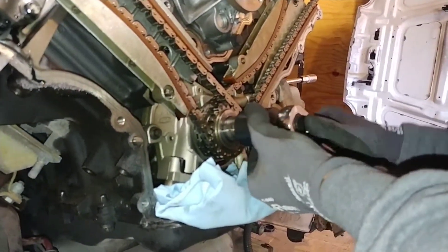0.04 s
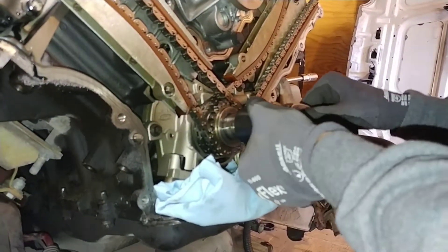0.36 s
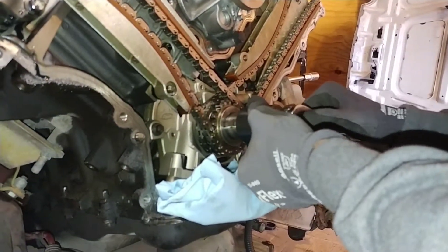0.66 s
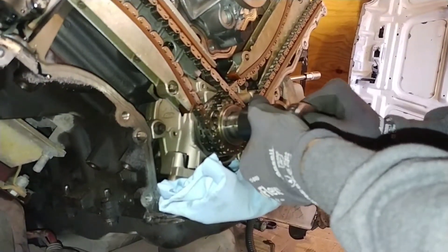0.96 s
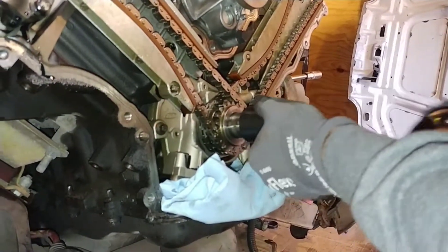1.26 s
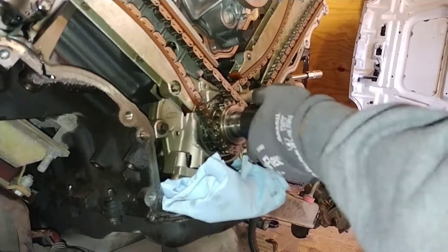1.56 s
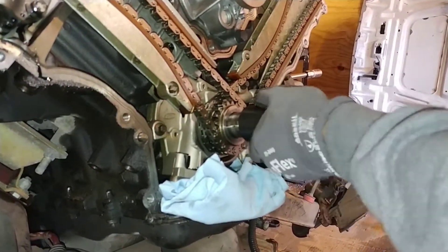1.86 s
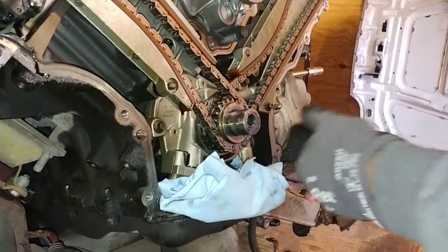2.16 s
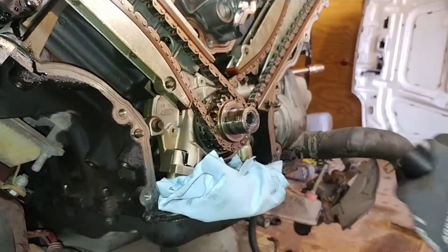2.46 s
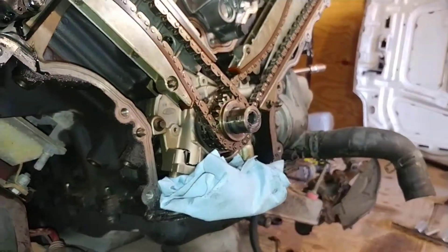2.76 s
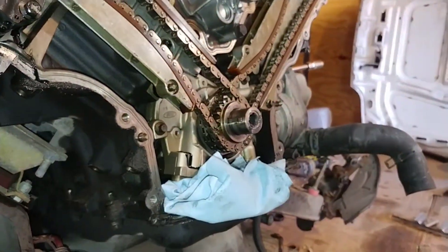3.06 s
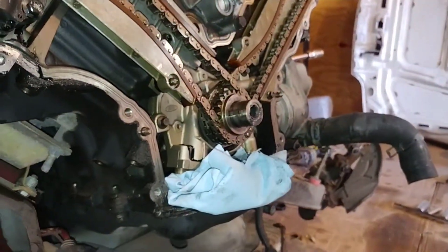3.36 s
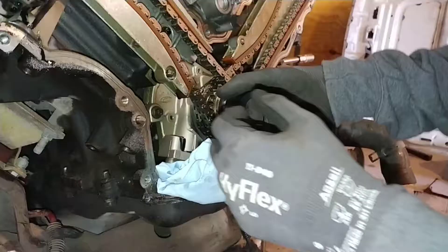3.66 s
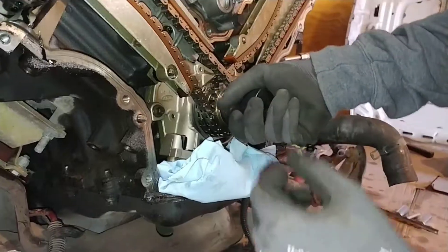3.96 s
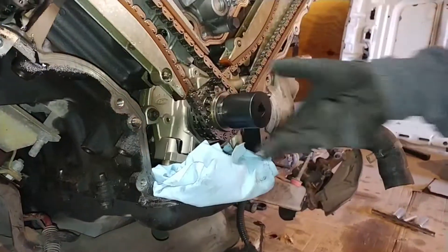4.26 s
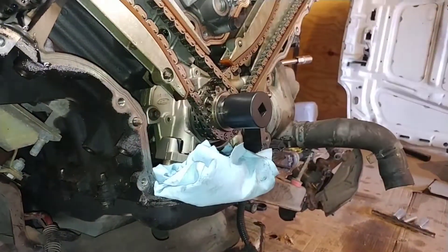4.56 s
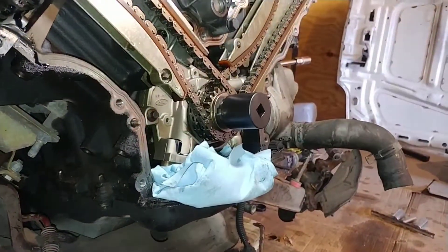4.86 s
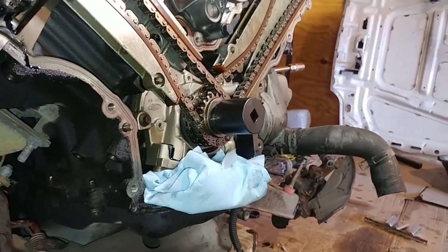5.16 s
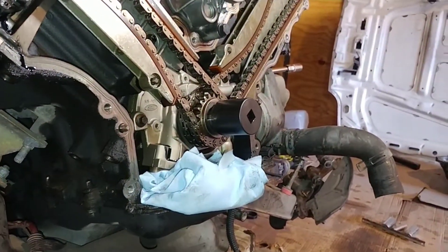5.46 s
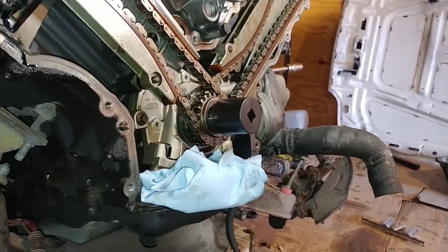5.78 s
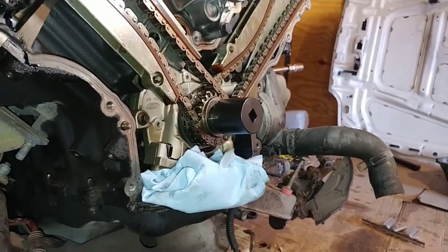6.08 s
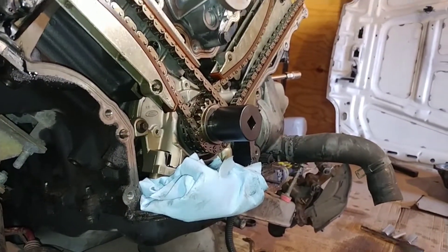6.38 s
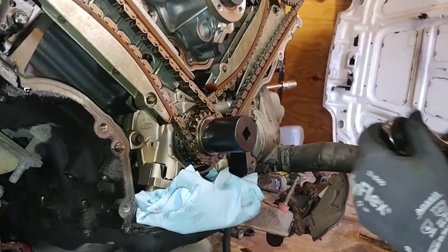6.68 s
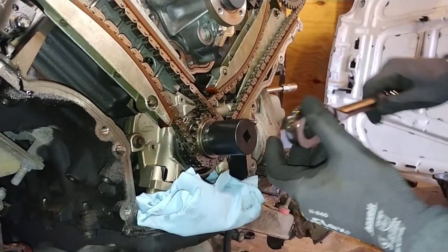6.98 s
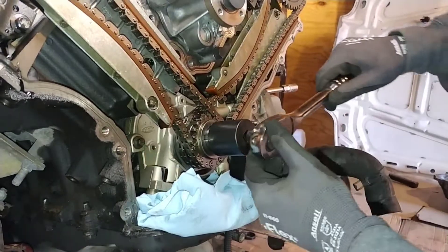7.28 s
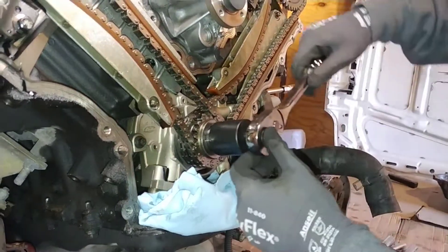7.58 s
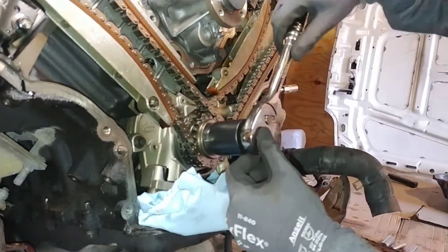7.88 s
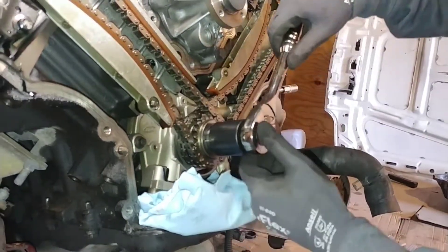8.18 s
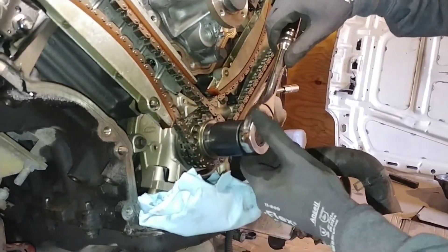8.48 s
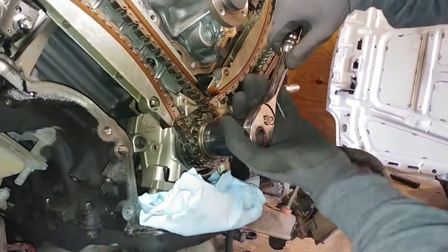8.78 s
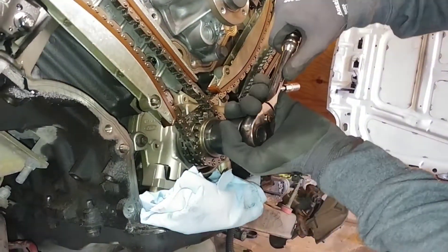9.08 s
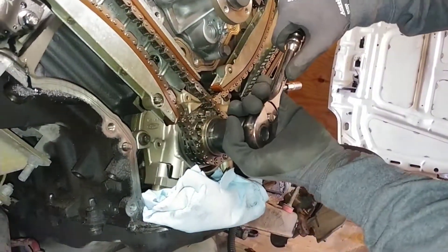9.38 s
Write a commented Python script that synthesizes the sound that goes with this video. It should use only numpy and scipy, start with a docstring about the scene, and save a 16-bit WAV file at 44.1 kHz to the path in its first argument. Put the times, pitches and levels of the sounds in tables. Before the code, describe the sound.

A quick run of sharp steel clicks opens the first half second as a tool knocks against an engine's crankshaft. Lighter taps, a small clink near 0.9 seconds and soft, dull bumps follow until about 3 seconds. At 3.25 seconds a big steel socket clangs down, bounces louder at 3.4 and rings brightly, breaking off abruptly at 3.5. A quiet stretch follows, with faint glove and sleeve rubs, tiny taps and one soft ringing ting at 5.3 seconds. From 7.3 to 7.8 seconds a ratchet is worked into the socket with uneven clicks and short clinks, and it snaps home loudly at about 8.1. Faint glove rubbing continues to around 9.5 seconds. The tools are close and slightly to the right, with a short garage echo over a low rumble and a faint hum.

```python
"""Socket and ratchet on an engine

Steel tools click against a crankshaft; a big socket clangs down, bounces and rings in beating pairs of
modes; a ratchet is worked into it and snaps home. In between, gloves rub, steel taps and parts bump.
The engine bay scatters each click and the garage echoes, over a low rumble and a faint hum."""
import sys
import numpy as np
from scipy import signal
from scipy.fft import rfft, irfft, next_fast_len
from scipy.io import wavfile
from scipy.ndimage import uniform_filter1d, minimum_filter1d

SR = 44100
rng = np.random.default_rng(int(sys.argv[2]) if len(sys.argv) > 2 else 0)


def waveform_to_disk(signal):
    """Save audio, clipped to [-1, 1], as 16-bit WAV at the path in sys.argv[1]."""
    frames = np.transpose(np.atleast_2d(signal))
    scaled = np.clip(frames, -1, 1) * 32767
    samples = np.round(scaled).astype(np.int16)
    wavfile.write(sys.argv[1], SR, samples)


N = 424683

# background spectrum (frequency [Hz], relative density [dB])
BACKGROUND_SPECTRUM = [(15, -27.5), (25, -3.5), (86, -2), (127, -11), (160, -13.5), (244, -21.5),
                       (263, -19.5), (390, -23.5), (1000, -30), (1920, -32.5), (2250, -30), (4690, -38.5),
                       (6090, -46), (13000, -49.5)]
# hum swells (middle [s], length [s])
HUM_SWELLS = [(5.257, 1.2), (8.9, 0.91)]
# garage echo (frequency [Hz], density [dB], t60 [s])
ECHO_BANDS = [(150, -5, 0.5), (498.8, -0.5, 0.45), (1070, -0.5, 0.6), (1530, -4.5, .5), (2340, -4, 0.62),
              (3522, -11, 0.43), (5303, -14.5, 0.48), (6400, -17.5, 0.32), (8500, -13.5, 0.45),
              (11700, -24, .25)]
# left-right balance by frequency: the left side is weaker from about 1 to 7 kHz (frequency [Hz], left minus
# right [dB])
WORK_PAN = [(300, 0.5), (800, -1.5), (1450, -4), (2200, -9), (3500, -10), (5200, -8.5), (6300, -4.5),
            (8000, 1.5), (11000, .5)]
# gloves and sleeves, and a few brief steel scrapes (middle [s], length [s], level [dB], centre [Hz])
CLOTH_RUBS = [(.915, .05, -54, 3000), (1.24, .07, -71, 4000), (1.315, .075, -62.5, 3800),
              (1.466, .14, -70, 3400), (2.519, 1, -71, 863), (2.798, 0.61, -75.5, 2950),
              (3.675, 0.24, -74, 4030), (4.125, 0.13, -66.5, 4500), (4.42, 0.36, -73.5, 895),
              (4.45, .3, -75, 2400), (4.69, 0.4, -70.5, 3600), (6.55, .25, -80, 3300),
              (6.82, .15, -76, 3600), (7.005, .03, -68, 4000), (8.672, 0.11, -68, 4600),
              (8.95, .8, -74, 2100), (9.05, .5, -73.5, 4200), (9.44, 0.24, -73, 2500)]
# heavy parts bumping (time [s], level [dB], centre [Hz], knocks [count])
PART_BUMPS = [(.449, -57, 757, 1), (.829, -59, 660, 1), (0.832, -62, 109, 1), (0.993, -57, 89.5, 1),
              (1.739, -62, 696, 1), (1.821, -51, 730, 1), (1.835, -55.5, 740, 1), (2.224, -64.5, 726, 1),
              (2.726, -54.5, 550, 1), (2.732, -54, 170, 1), (2.79, -61, 524, 1), (3.2509, -41, 265, 1),
              (3.3744, -34.5, 290, 4), (3.582, -63.5, 468, 1), (3.935, -71, 855, 2), (5.324, -66.5, 910, 1),
              (7.28, -54.5, 850, 1), (7.719, -48, 420, 1), (8.139, -47.5, 480, 1)]
# taps on parts (time [s], relative level [dB], centre [Hz], t60 [ratio], touch [s], grit [dB])
PART_TAPS = [(.752, -68, 4900, 0.093, .0015, -1), (.824, -54.5, 4500, 0.2, .016, 1),
             (.829, -51.5, 1320, 0.45, 0.015, 3), (.92, -47, 3920, .14, 0.011, -4),
             (.925, -39, 1920, 0.97, 0.0067, 7), (1.74, -63.5, 2400, .1, .005, -9),
             (1.82, -47.5, 2220, 0.42, .016, 5), (1.952, -55.5, 2870, 0.27, 0.023, -1),
             (3.58, -56, 2300, .08, 0.0032, -2), (3.64, -70, 2475, .11, 0.0044, 0),
             (4.105, -62, 4600, .4, 0.027, -5), (4.655, -70, 3160, 0.42, .008, -14),
             (4.742, -62.5, 3180, 0.31, .008, -15), (4.78, -64, 2895, .6, .012, -5),
             (8.88, -65.5, 5000, .5, .012, -10)]
# tapped parts (frequency [Hz], level [dB], t60 [s])
PART_MODES = [(1420, -4, .09), (1700, -4, .15), (2215, -3, .4), (2420, -2, .15), (2640, -5, .12),
              (2890, -4, .2), (3208, -2, .22), (3550, -4, .12), (4540, -3, .12), (4990, -4, .16)]
# socket pushed home (start [s], length [s], level [dB], centre [Hz])
SOCKET_SCRAPES = [(3.923, .075, -75.5, 1100)]
# steel on steel (time [s], level [dB], resonance [Hz], body [dB], treble [dB], second contact offset [s])
STEEL_CLICKS = [(.0075, -23, 4550, -8.5, -18, -0.0054), (.069, -22.5, 3700, -13, -23.5, 0),
                (0.1242, -44.5, 3300, -1.5, -24.5, 0), (0.1353, -25.5, 4650, -3.5, -12.5, 0),
                (.2085, -28, 5200, -1.5, -7.5, 0), (.3409, -21.5, 3650, -17, -22, -0.00057),
                (3.2514, -22.5, 3250, -10, -21.5, -0.0037), (3.3712, -24, 4000, -6.5, -19.5, 0),
                (3.376, -14, 3000, -7.5, -26, -0.0022), (3.407, -23.5, 3900, -9.5, -22.5, 0),
                (5.324, -52, 3400, 2, -30, 0), (7.28, -45, 1470, 16.5, -32, 0),
                (7.37, -30, 4960, 2.5, -15.5, 0), (7.469, -37.5, 3540, 16.5, -26.5, 0),
                (7.5113, -22.5, 4120, -7, -7, 0), (7.575, -26.5, 4650, -11, -11.5, -.0036),
                (7.6398, -29, 5100, -5.5, -6, -.003), (7.7195, -21.5, 4600, 3.5, -27, .0034),
                (7.729, -28, 2600, 1.5, -31.5, 0), (7.77, -34, 4500, -17.5, -18.5, 0),
                (7.7812, -19, 4900, -5.5, -14.5, 0), (8.1392, -14.5, 5030, -4.5, -11, -0.0013)]
# click spectrum (frequency [Hz], level [dB], body share [ratio], treble share [ratio])
CLICK_SPECTRUM = [(100, -11.5, 0.7, 0.17), (383, -19, 0.99, 0.029), (625, -2.5, 0.77, 0.16),
                  (1600, 2, 0.81, 0.014), (2700, 5, 0.8, 0.092), (5470, -2.5, 0.06, 0.045),
                  (6900, 0.5, 0.5, 0.74), (8760, -3, 0.002, 0.82), (10230, -13.5, 0, 0.91),
                  (11164, -8.5, 0.78, 1), (11500, -12.5, 0.94, 1), (13000, -35.5, 0.076, 0.97)]
# damped tool head (frequency [Hz], level [dB], t60 [s])
HEAD_MODES = [(2750, -2, .016), (3300, -1, .007), (3650, -3, .005), (3950, -4, .005), (4550, 0, .009),
              (5130, -1, .012), (5480, -7, .009), (7350, -17, .01), (8750, -19, .022), (11400, -24, .02)]
# ratchet's faint ring (frequency [Hz], level [dB], t60 [s])
RATCHET_MODES = [(1470, 3, 0.28), (1780, 3, 0.2), (2156, -5.5, .25)]
# knocks on the ratchet (time [s], level [dB], t60 [ratio])
RATCHET_KNOCKS = [(.0075, -58, 0.88), (.1352, -59, 1), (7.28, -52, 1), (7.37, -54, 1), (7.7195, -48.5, 1),
                  (7.7813, -48.5, 1)]
# socket seated on the crankshaft (frequency [Hz], level [dB], t60 [s])
SEATED_MODES = [(2444, -20, .5), (2750, -10, 0.11), (2815.4, 0.5, .55), (2857, -3, 0.55),
                (3430, -11.5, 0.28), (4926, -22.5, .22), (5006, -20.5, .4)]
# knocks on the seated socket (time [s], level [dB], t60 [ratio])
SEATED_HITS = [(5.3238, -44, 0.97), (7.512, -50.5, .4), (7.639, -40, 0.41), (7.72, -38, .25),
               (7.7826, -46, .3), (8.139, -14.5, 0.042), (8.146, -43, .8)]
# what the socket lands on (frequency [Hz], relative density [dB], t60 [s])
CLATTER_BANDS = [(100, -22.5, .4), (230.7, -4.5, 0.3), (500, -7, 0.53), (990, -10.5, 0.25), (2001, 2.5, 1),
                 (2750, 8, 0.52), (3900, -3, .6), (5173, 3, 0.552), (6400, -16, .45), (8510, -13, .36),
                 (9740, -33, .15), (11298, -31, .15), (13490, -57.5, .1)]
# loose socket (frequency [Hz], level [dB], t60 [s], left minus right [dB], gain by strike place [dB])
LOOSE_MODES = [(2707, -18, .5, -7.5, 0), (2746, -18, .4, -7, 0), (2802, -13, .55, -3, 1.5),
               (2834, 1, .64, -11, -1), (2865, -3, .55, -7.5, -2.5), (2912, -14, .6, -6, 5),
               (3009, -17, .25, -5, 2), (3115, -20, .4, -5.5, 1), (3262, -19, .25, -6, 4),
               (3395, -19, .35, -7, 0), (3425, -20, .35, -6, -7), (3763, -23, .35, -6, 0),
               (4670, -22, .45, -8.5, 0), (4936, -13, .35, -4.5, -2), (5020, -7, .35, -4, -2),
               (5060, 0, .7, -5, -1), (5115, -9, .3, -6, -1), (5240, -8, .35, -7, 4), (5289, -3, .5, -6, 7),
               (7893, -22, .3, 3, 0), (8130, -34, .3, -1.5, 4), (8670, -22, .2, -3, 4),
               (8760, -25, .16, -2, 3), (11300, -37, .2, 10, -2), (11480, -38, .12, 10, 0)]
# blows on the loose socket (time [s], ring [dB], strike place [-1..1], clatter [dB])
LOOSE_BLOWS = [(3.251, -18.5, 1, -31), (3.3741, -12, -.85, -23.5)]


def undb(db):
    """Decibels to gain."""
    return 10 ** (np.asarray(db) / 20)


def unit(x):
    """Scale to rms 1."""
    return x / np.sqrt(np.mean(x ** 2))


def onset_std(x):
    """Spread over the first 20 ms."""
    return x[:, :SR // 50].std()


def sides(pan_db):
    """Left and right gains at constant power."""
    return unit(undb(np.array([[pan_db], [-pan_db]]) / 2))


def add(out, s, x):
    """Mix x in from time s."""
    i = max(int(s * SR), 0)
    out[:, i:i + x.shape[1]] += x[:, :N - i]


def fade(t, t60_s):
    """Exponential decay."""
    return np.exp(-np.log(1000) * t / t60_s)


def swell(t, s, length_s):
    """Gaussian hump round time s."""
    return np.exp(-(2 * (t - s) / length_s) ** 2)


def along(f, hz, values):
    """Interpolate over log frequency."""
    return np.interp(np.log(f + 1), np.log(hz), values)


def bell(f, hz, octaves):
    """Gaussian hump round hz."""
    return np.exp(-.5 * (np.log2((f + 1) / hz) / octaves) ** 2)


def walk(rate_hz, size=N):
    """Smooth random drift, rms 1."""
    hold = int(SR / rate_hz)
    steps = np.repeat(rng.standard_normal(size // hold + 1), hold)
    return unit(uniform_filter1d(uniform_filter1d(steps, hold), hold)[:size])


def colour(x, gain):
    """Minimum-phase filter with response gain(Hz)."""
    n = 2 * next_fast_len(x.shape[-1])
    cepstrum = irfft(np.log(gain(np.arange(n // 2 + 1) * SR / n) + 1e-6))
    cepstrum[1:n // 2] *= 2
    cepstrum[n // 2 + 1:] = 0
    return irfft(rfft(x, n) * np.exp(rfft(cepstrum)))[..., :x.shape[-1]]


def lean(x, share=1):
    """Pan rightward by frequency, at constant power."""
    ratio = lambda f: undb(share * along(f, *np.transpose(WORK_PAN)))
    right = lambda f: np.sqrt(2 / (1 + ratio(f) ** 2))
    return np.array([colour(x[0], lambda f: ratio(f) * right(f)), colour(x[1], right)])


def lag_left(x, lag_s=.00027):
    """Sound from the right reaches the left side later."""
    return np.array([np.pad(x[0], (round(lag_s * SR), 0))[:N], x[1]])


def modes(table, t, weight_db, scatter_db=2, t60_ratio=1, apart_rad=.9):
    """Decaying partials weighted by weight_db(Hz); each strike excites them differently."""
    out = 0
    for (hz, db, t60_s), (loud, turn, apart) in zip(table, rng.standard_normal((len(table), 3))):
        phase = np.pi * turn + apart_rad * apart * np.array([[0], [1]])
        gain = undb(db + weight_db(hz) + scatter_db * loud)
        out = out + gain * np.sin(2 * np.pi * hz * t + phase) * fade(t, t60_s * t60_ratio)
    return out


def wash(table, alike_hz=500, size=36000):
    """Diffuse decay in third octaves; the lows are alike on both sides."""
    hz, db, t60_s = np.transpose(table)
    t, f = np.arange(size) / SR, np.arange(size // 2 + 1) * SR / size
    left, other = rfft(rng.standard_normal((2, size)))
    alike = np.exp(-.5 * (f / alike_hz) ** 2)
    noise = np.array([left, alike * left + np.sqrt(1 - alike ** 2) * other])
    out = 0
    for centre_hz in 80 * 2 ** (np.arange(23) / 3):
        inside = abs(np.log2((f + 1) / centre_hz)) < 1 / 6
        band = irfft(noise * inside) * fade(t, along(centre_hz, hz, t60_s))
        band *= np.sqrt(inside.mean() / np.sum(band ** 2, axis=1, keepdims=True))
        out = out + band * undb(along(centre_hz, hz, db))
    return out


def background(level_db=-62, lull_db=-5.5, hum_hz=153, rumble_flutter_db=3, hiss_flutter_db=1.8):
    """Unsteady rumble and hiss with one lull; a faint hum swells twice."""
    t = np.arange(N) / SR
    spectrum = lambda f: undb(along(f, *np.transpose(BACKGROUND_SPECTRUM)))
    mono_share = lambda f: .9 * bell(f, 260, octaves=1.2)
    noise = colour(rng.standard_normal((2, N)), lambda f: spectrum(f) * np.sqrt(1 - mono_share(f)))
    noise += colour(rng.standard_normal((1, N)), lambda f: spectrum(f) * np.sqrt(mono_share(f)))
    noise = unit(noise) * undb(level_db + lull_db * swell(t, 6.11, length_s=.59))
    low = signal.sosfiltfilt(signal.butter(2, 140, fs=SR, output="sos"), noise)
    hum_rad = 2 * np.pi * np.cumsum(hum_hz * (1 + .071 * walk(23))) / SR
    hum_db = -79.5 + 17 * sum(swell(t, *row) for row in HUM_SWELLS) + 2 * walk(7.4)
    rumble = low * undb(rumble_flutter_db * walk(16)) * sides(pan_db=4)
    hiss = (noise - low) * undb(hiss_flutter_db * walk(3))
    return rumble + hiss + np.sin(hum_rad) * undb(hum_db)


def garage_echo(x, response, wet_db):
    """The room's diffuse answer to the mono sum."""
    return undb(wet_db) * signal.oaconvolve(x.sum(0, keepdims=True) / np.sqrt(2), response, axes=1)[:, :N]


def rubs(grain_db=3, grain_hz=140):
    """Cloth catches and slips, and steel scrapes briefly: grainy hiss that swells and dies."""
    out, grain = np.zeros((2, N)), undb(grain_db * walk(grain_hz))
    rolloff = lambda f: undb(along(f, [5400, 6500, 12000], [0, -12, -19]))
    for s, length_s, db, hz in CLOTH_RUBS:
        size = int(length_s * SR)
        octaves = .99 + .2 * np.log2(hz / 4500)  # brighter rubs are broader
        hiss = colour(rng.standard_normal((2, size)), lambda f: (bell(f, hz, octaves) + .012) * rolloff(f))
        add(out, s - length_s / 2, unit(hiss) * np.hanning(size) * undb(db) * sides(pan_db=-2))
    return out * grain


def bumps(t60_s=.075, gap_s=.036, gap_ratio=.9, step_db=-4.5, size=8192):
    """Soft blows on heavy parts: dull knocks, faster and weaker as a part rocks to rest."""
    out, t = np.zeros((2, N)), np.arange(size) / SR
    for s, db, hz, count in PART_BUMPS:
        for k in range(round(count)):
            burst = rng.standard_normal((1, size)) * fade(t, t60_s)
            knock = colour(burst, lambda f: bell(f, hz, octaves=.46) + .0018)
            knock /= np.sqrt(np.sum(knock ** 2) / (.015 * SR))  # energy of 15 ms at rms 1
            add(out, s, knock * undb(db + k * step_db))
            s += gap_s * gap_ratio ** k
    return out


def grit(noise, hz, octaves, floor=0):
    """Friction noise: a band round hz, the top shelved down."""
    return colour(noise, lambda f: (bell(f, hz, octaves) + floor) * undb(along(f, [5400, 6500], [0, -12])))


def taps(octaves=.35, focus_db=16, size=24000):
    """Steel brushes a part: brief grit, under which the part's ring builds."""
    out, t = np.zeros((2, N)), np.arange(size) / SR
    for s, db, hz, t60_ratio, touch_s, grit_db in PART_TAPS:
        ring = modes(PART_MODES, t, lambda f: focus_db * (bell(f, hz, octaves) - 1), t60_ratio=t60_ratio)
        ring *= 1 - np.exp(-2 * t / touch_s)
        touch = t / touch_s * np.exp(-(t / touch_s) ** 2)
        brush = grit(rng.standard_normal((2, size)) * touch, hz, octaves, floor=.017)
        tap = ring / onset_std(ring) + undb(grit_db) * brush / onset_std(brush)
        add(out, s, tap * undb(db) * sides(pan_db=-1) / (2 * onset_std(tap)))
    return out


def scrapes(gap_s=.012, scatter_db=8, t60_s=.013, count=12, size=1024):
    """Steel slides on steel in jerks: an uneven run of fine ticks."""
    out, t = np.zeros((2, N)), np.arange(size) / SR
    for s, length_s, db, hz in SOCKET_SCRAPES:
        delays_s = gap_s * np.cumsum(rng.uniform(.17, 1.4, count))
        levels_db = db + scatter_db * rng.standard_normal(count)
        for delay_s, tick_db, noise in zip(delays_s, levels_db, rng.standard_normal((count, 2, size))):
            if delay_s < length_s:
                tick = grit(noise * fade(t, t60_s), hz, octaves=1.6)
                add(out, s + delay_s, tick / tick[:, :SR // 250].std() * undb(tick_db))
    return out


def contacts(second_db=-4, min_offset_s=.002):
    """Each touch of steel; some have a lighter contact just before or after."""
    for s, db, hz, body_db, treble_db, offset_s in STEEL_CLICKS:
        yield s, db, hz, body_db, treble_db
        if abs(offset_s) > min_offset_s:
            yield s + offset_s, db + second_db, hz, body_db, treble_db


def clicks(snap_t60_s=.006, bay_t60_s=.073, bay_db=-19, rise_s=.0012, mono_share=.51, size=4096):
    """Steel cracks on steel and the tool head rings briefly; the engine bay answers, duller."""
    out, t = np.zeros((2, N)), np.arange(size) / SR
    points_hz, plain_db, body_share, treble_share = np.transpose(CLICK_SPECTRUM)
    attack = 1 - np.exp(-t / rise_s)
    for s, db, hz, body_db, treble_db in contacts():
        noise = rng.standard_normal((3, size))
        noise = np.sqrt(mono_share) * noise[0] + np.sqrt(1 - mono_share) * noise[1:]
        shape_db = plain_db + body_share * body_db + treble_share * treble_db
        # less body, stronger contact resonance
        focus_db = lambda f: (10 - .78 * body_db) * bell(f, hz, octaves=.21)
        snap_gain = lambda f: undb(along(f, points_hz, shape_db) + focus_db(f) / 2)
        bay_gain = lambda f: undb(along(f, points_hz, shape_db - 6 * treble_share))
        snap = colour(noise * fade(t, snap_t60_s) * attack, snap_gain)
        head = unit(modes(HEAD_MODES, t, focus_db) * attack) * snap.std() * undb(4 - max(body_db, 0))
        bay = colour(noise[::, ::-1] * fade(t, bay_t60_s), bay_gain)
        click = snap + head + undb(bay_db) * bay
        click /= np.sqrt(np.sum(click ** 2, axis=1, keepdims=True) / (.0049 * SR))
        add(out, s, click * undb(db))
    return out


def ringing(knocks, table, scatter_db=1.5, flutter_hz=70, flutter_db=3, size=30000):
    """Steel rings on after each knock; each mode flutters as the part shifts."""
    out, t = np.zeros((2, N)), np.arange(size) / SR
    for s, db, t60_ratio in knocks:
        for mode in table:
            partial = modes([mode], t, lambda f: db, scatter_db, t60_ratio)
            add(out, s, partial * undb(flutter_db * walk(flutter_hz, size)))
    return out


def wavering_mode(t, hz, main_hz, rate_hz=90, depth_db=1.9, depth_rad=.38):
    """The socket shakes: level and phase wander, the phase more in higher modes."""
    gain = undb(depth_db * walk(rate_hz, len(t)))
    phase = depth_rad * np.sqrt(hz / main_hz) * walk(rate_hz, len(t))
    return gain * np.sin(2 * np.pi * hz * t + phase)


def loose_socket(main_hz=2834, hard_db=-12, rise_s=.0015, chatter_hz=170, chatter_db=2, size=36000):
    """The steel tube rings in beating pairs over a clatter; each blow stops the previous ring."""
    rings, clatters, t = np.zeros((2, N)), np.zeros((2, N)), np.arange(size) / SR
    for s, db, place, clatter_db in LOOSE_BLOWS:
        tilt_db_per_octave = .06 * (db - hard_db)  # softer blows are duller
        ring = 0
        for k, (hz, mode_db, t60_s, pan_db, place_db) in enumerate(LOOSE_MODES):
            gain = undb(mode_db + place * place_db + tilt_db_per_octave * np.log2(hz / main_hz))
            ring += (-1) ** k * gain * sides(pan_db) * wavering_mode(t, hz, main_hz) * fade(t, t60_s)
        rings[:, int(s * SR):] = 0
        add(rings, s, undb(db) * ring * (1 - np.exp(-t / rise_s)))
        clatter = wash(CLATTER_BANDS) * undb(chatter_db * walk(chatter_hz, size))
        add(clatters, s, lean(clatter / onset_std(clatter), share=.46) * undb(clatter_db))
    return lag_left(rings) + clatters


def scene(click_wet_db=-.8, ring_wet_db=-8, soft_wet_db=-5, tap_wet_db=-4, cut_s=3.527, cut_fade_s=.002):
    """All sources in the garage; the clang breaks off at cut_s, echo and all."""
    echo = np.pad(wash(ECHO_BANDS), ((0, 0), (SR // 250, 0)))  # 4 ms pre-delay
    right_echo = lean(echo)
    room = lambda x, wet_db: x + garage_echo(x, echo, wet_db)
    ring_room = lambda x: x + garage_echo(x, right_echo, ring_wet_db)
    click_room = lambda x: lag_left(x) + garage_echo(x, right_echo, click_wet_db)
    before = np.clip((cut_s - np.arange(N) / SR) / cut_fade_s, 0, 1)
    after = 1 - before
    knocks = bumps()
    steel = lean(clicks() + ringing(RATCHET_KNOCKS, RATCHET_MODES))
    early = ring_room(loose_socket()) + room(knocks * before, soft_wet_db) + click_room(steel * before)
    late = room(knocks * after + rubs(), soft_wet_db) + click_room(steel * after)
    seated = ring_room(lag_left(lean(ringing(SEATED_HITS, SEATED_MODES), share=.7)))
    return early * before + late + seated + room(taps() + scrapes(), tap_wet_db) + background()


def record(dry, ceiling=.95, top_hz=13500):
    """Peak limiter, then a steep low-pass."""
    window = SR // 250
    gain = ceiling / np.maximum(abs(dry).max(0), ceiling)
    limited = dry * uniform_filter1d(minimum_filter1d(gain, window), window)
    return signal.sosfilt(signal.ellip(8, .2, 70, top_hz, fs=SR, output="sos"), limited)


dry = scene()
out = record(dry)
waveform_to_disk(out)
```